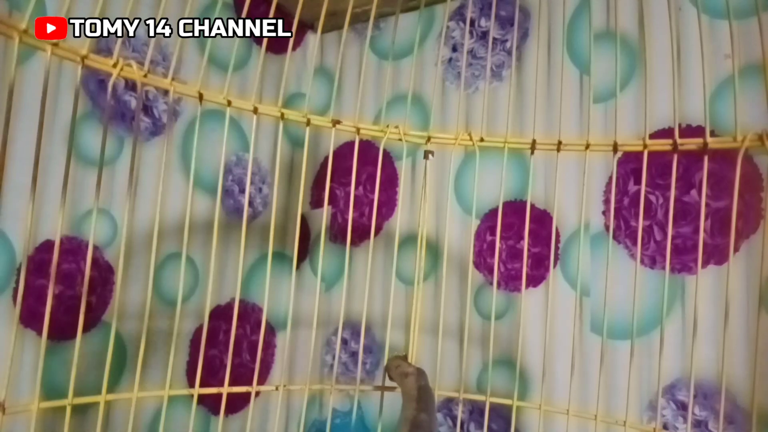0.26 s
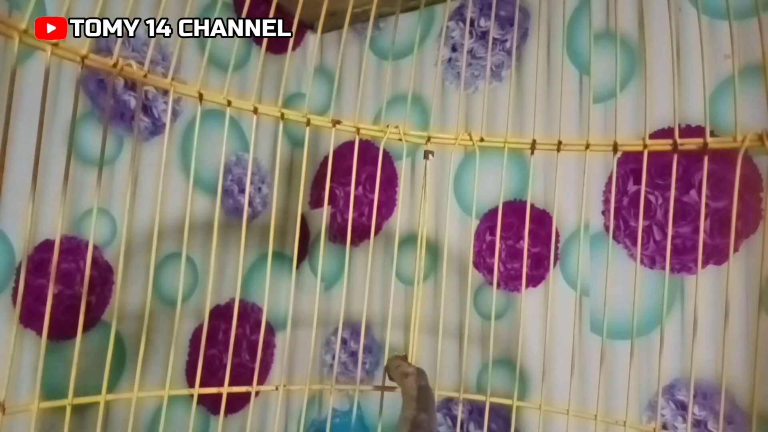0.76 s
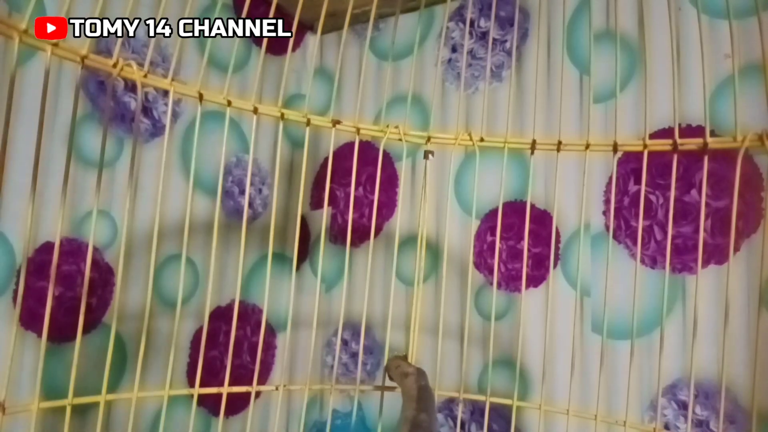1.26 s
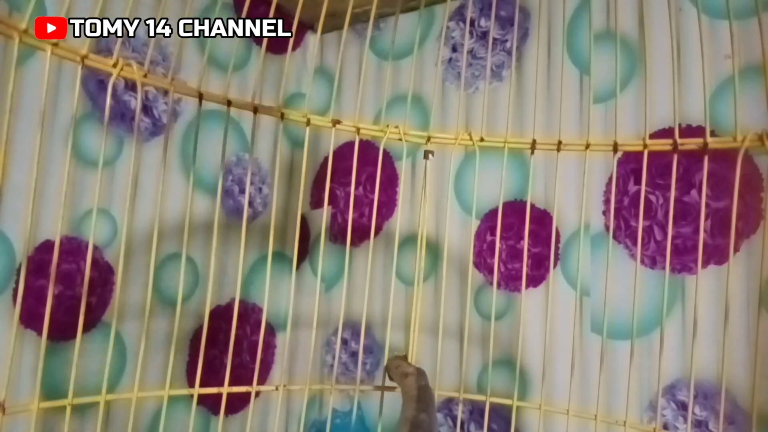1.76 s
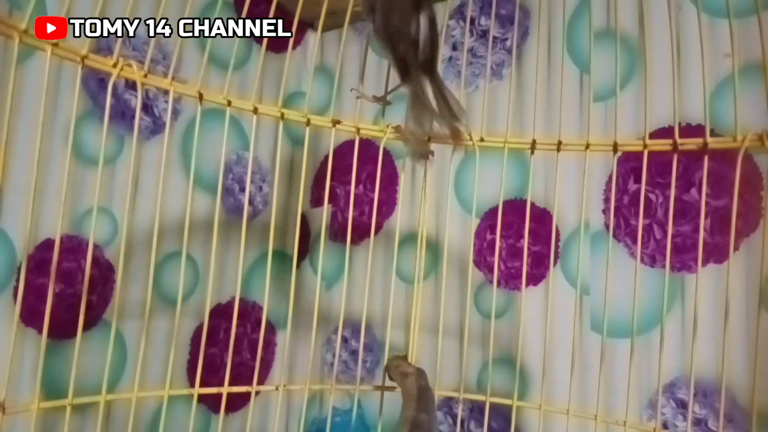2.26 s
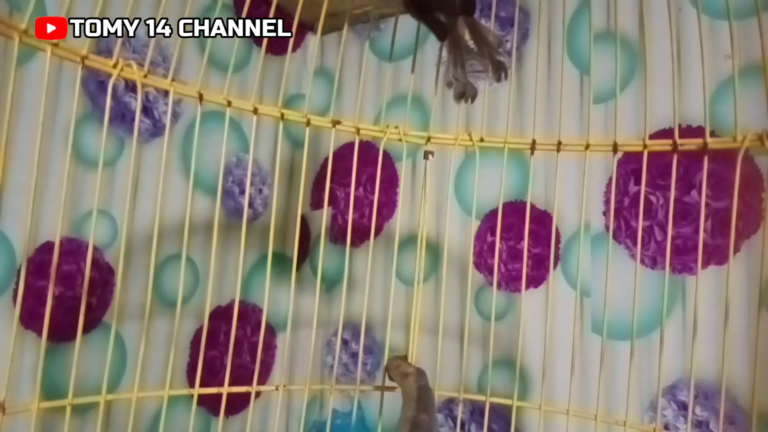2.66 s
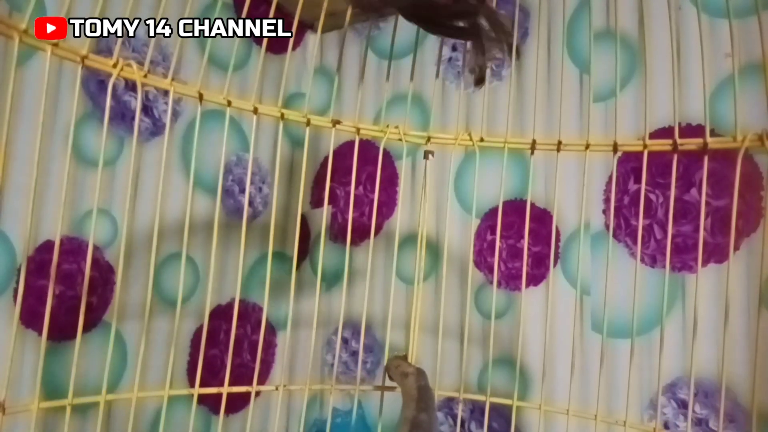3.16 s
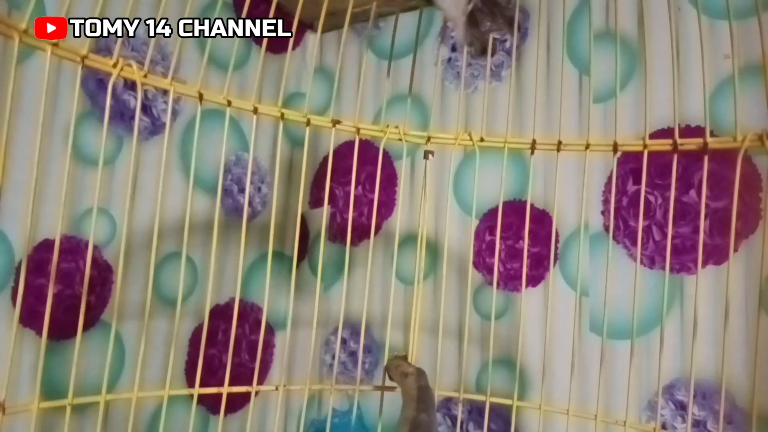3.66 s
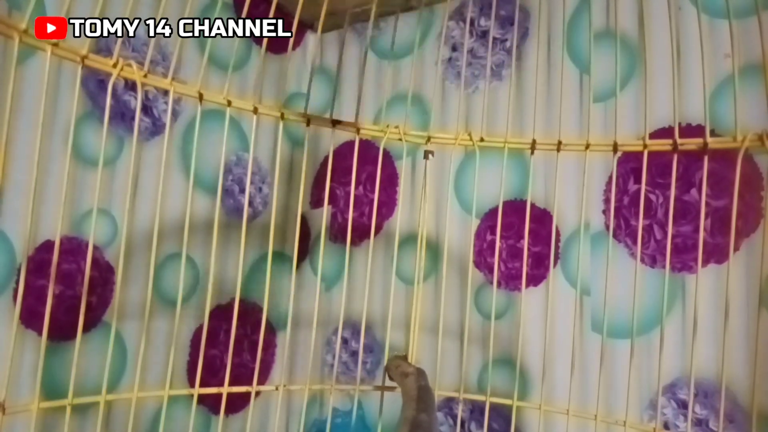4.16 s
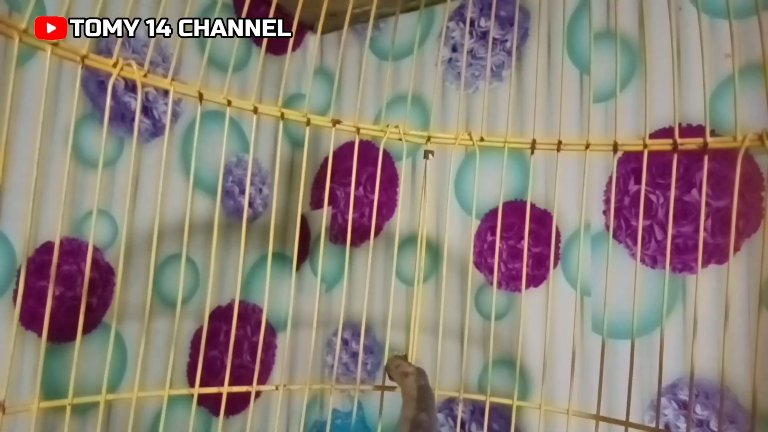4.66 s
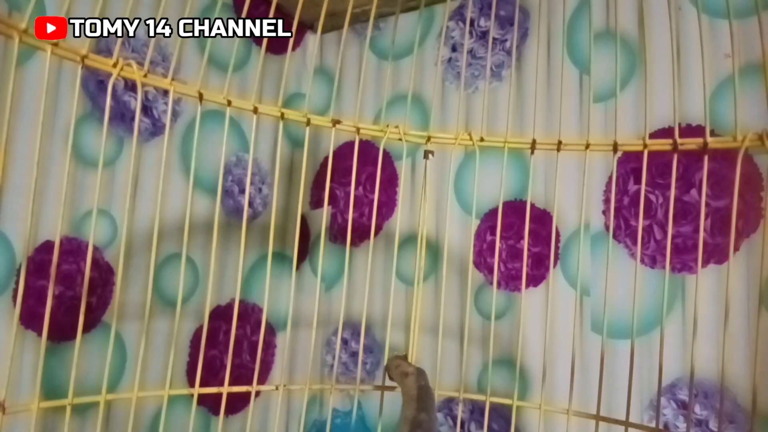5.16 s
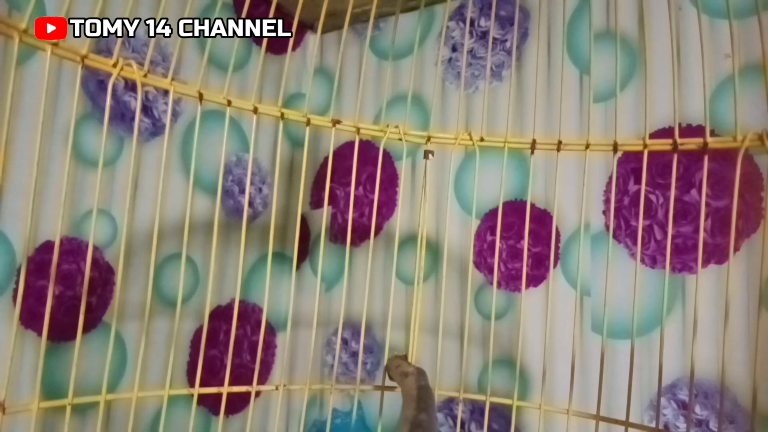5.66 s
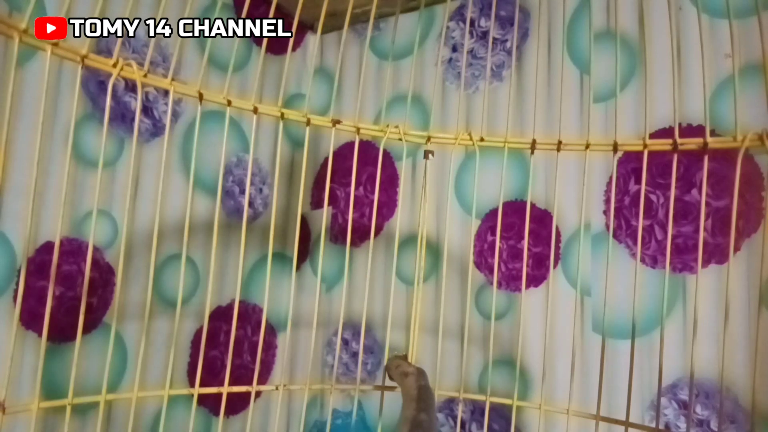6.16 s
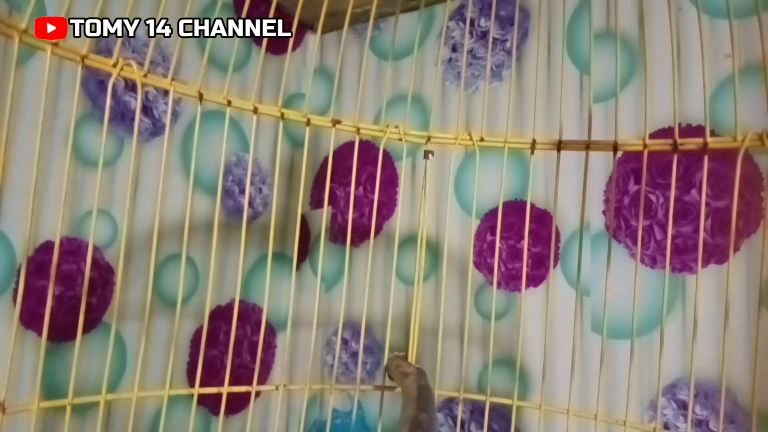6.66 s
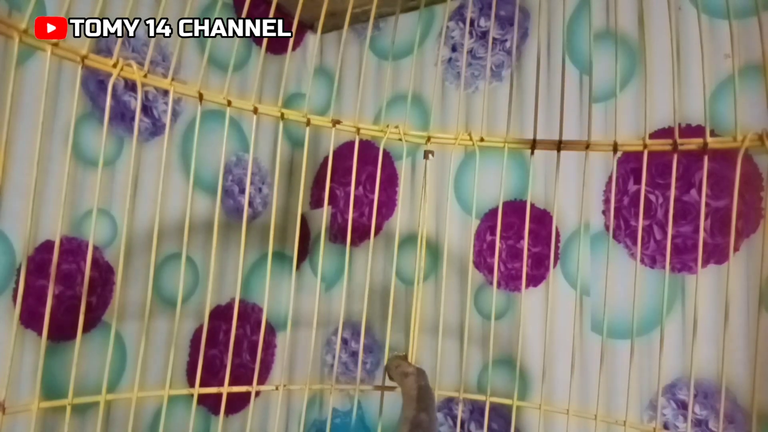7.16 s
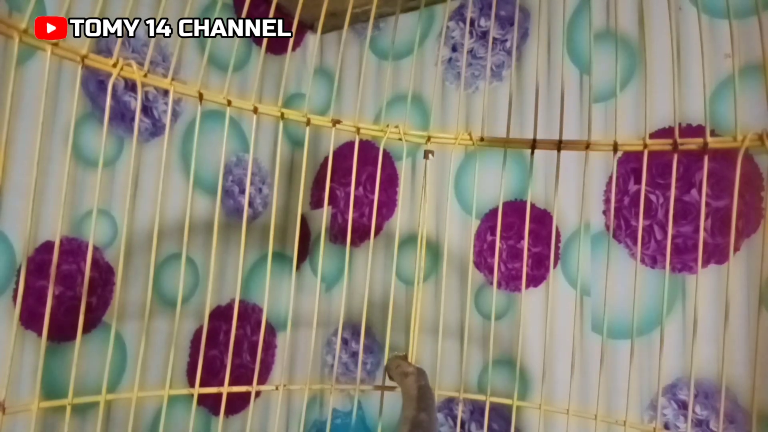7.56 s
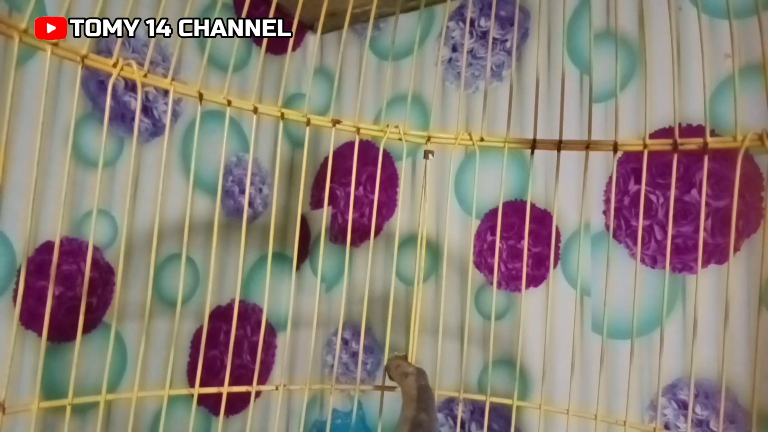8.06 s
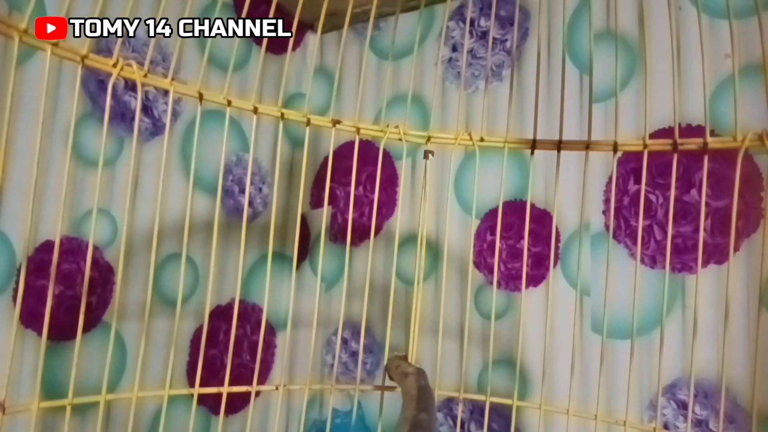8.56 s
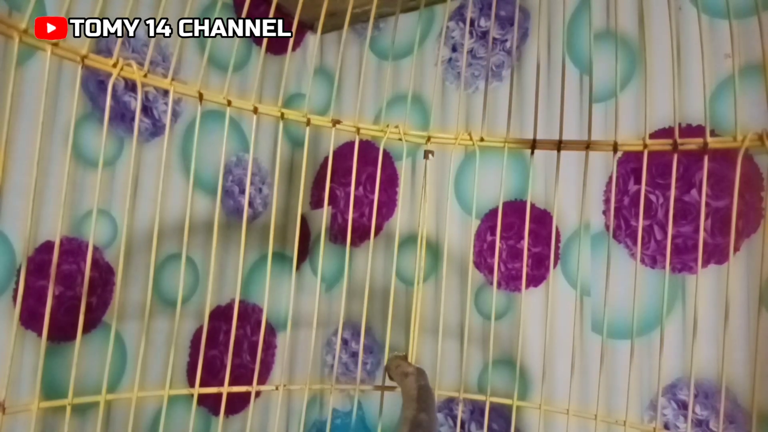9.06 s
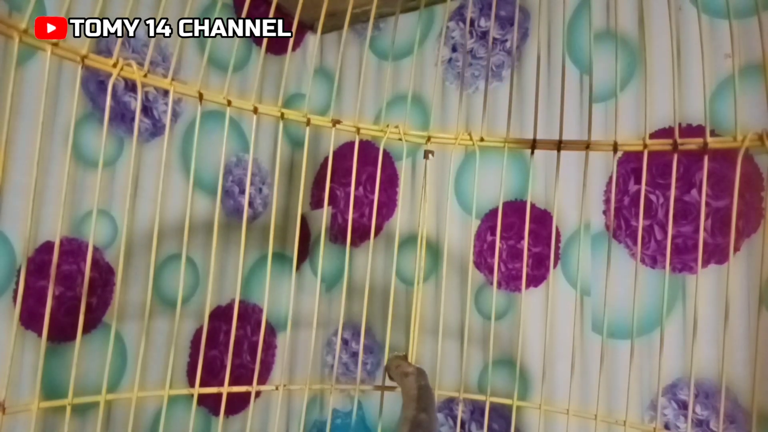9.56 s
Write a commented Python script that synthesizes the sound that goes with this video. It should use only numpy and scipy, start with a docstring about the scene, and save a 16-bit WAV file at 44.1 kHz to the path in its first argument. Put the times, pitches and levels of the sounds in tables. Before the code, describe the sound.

A small bird in a wire cage, close to the microphone in a small hard room, repeats short sharp falling notes about four times a second. A quick soft wing flutter passes near two seconds. After three seconds the calling stops, with faint rustles and a few lone, softer notes, then the run resumes to the end over low room noise.

```python
"""Caged prinia calling in a small room

A prinia in a wire cage, close to the microphone, repeats a sharp falling note about four times a second.
Source-filter synthesis: harmonics of a falling pitch pass throat resonances; effort sets pitch, level and timbre.
Echoes from near walls smear each note and a diffuse tail rings on.
Shaped resonant noise makes one wing flutter, rustles and faint swells.
Background noise and a faint wavering hum of unrelated tones lie beneath.
"""
import sys
import numpy as np
from scipy import signal
from scipy.fft import rfft, irfft
from scipy.io import wavfile
from scipy.ndimage import uniform_filter1d

SR = 44100
rng = np.random.default_rng(int(sys.argv[2]) if len(sys.argv) > 2 else 0)


def dump_mix(stems):
    """Bounce the given channels to the path in sys.argv[1] as a 16-bit WAV at rate SR."""
    frames = np.atleast_2d(stems).T  # one column per channel
    limited = np.clip(frames, -1, 1)  # hard clip at full scale
    pcm = np.round(limited * 32767).astype(np.int16)
    wavfile.write(sys.argv[1], SR, pcm)


N = 432180
TIME = np.arange(N) / SR


def undb(db):
    """Decibel law: level in dB to amplitude gain."""
    return 10 ** (np.asarray(db) / 20)


def unit(x):
    """Normalisation: scale to a root-mean-square of one."""
    return x / np.sqrt(np.mean(x ** 2) + 1e-18)


def spectrum_at(hz, points):
    """Spectral envelope: gain at hz, interpolated in dB over log frequency."""
    point_hz, point_db = np.transpose(points)
    return undb(np.interp(np.log(hz + 1e-9), np.log(point_hz), point_db))


def band_noise(size, hz, width):
    """Resonance: white noise shaped to one steep-skirted band, width in Hz between its half-amplitude points."""
    f = np.fft.rfftfreq(size, 1 / SR) + 1e-9
    detuning = (f * f - hz * hz) / (f * width)
    white = rfft(rng.standard_normal(size))
    return unit(irfft(white / (1 + detuning ** 2), size))


def waver(size, rate):
    """Random modulation: twice-smoothed noise of unit rms; rate in Hz sets its speed."""
    k = max(int(SR / rate), 1)
    once = uniform_filter1d(rng.standard_normal(size), k)
    return unit(uniform_filter1d(once, k))


def add(out, start, x):
    """Superposition: mix a sound in at its start time in s."""
    i = int(start * SR)
    a, b = max(i, 0), min(i + len(x), N)
    if b > a:
        out[a:b] += x[a - i:b - i]


def soft_sounds(table, uneven_db=2, flutter_db=3):
    """Amplitude-modulated noise: short uneven swells, each in its own resonance."""
    out = np.zeros(N)
    for middle, length, hz, width, db in table:
        size = int(length * SR)
        flutter = undb(flutter_db * waver(size, 200))
        shape = np.sqrt(np.hanning(size)) * undb(db + uneven_db * waver(size, 60))
        add(out, middle - length / 2, shape * unit(flutter * band_noise(size, hz, width)))
    return out


def snap(db, length=0.0048, low_hz=2750, knee_hz=3350, top_hz=5000, octave_db=-3):
    """Transient chirp: the membranes start low and jump up within milliseconds, a dry click opening the note."""
    u = np.linspace(0, 1, int(length * SR))
    hz = np.interp(u, [0, .7, 1], [low_hz, knee_hz, top_hz])
    phase = 2 * np.pi * np.cumsum(hz) / SR
    envelope = np.interp(u, [0, .15, .6, 1], [0, 1, 1, 0])
    return undb(db) * envelope * (np.sin(phase) + undb(octave_db) * np.sin(2 * phase))


# a usual note, at zero effort: time of the pitch crest [s], pitch late in the fall [Hz]
CREST_S, LATE_HZ = 0.01073, 2165
# its levels [dB]: effort curve at the flanks and in the middle, fundamental, overtones
FLANK_DB, MIDDLE_DB, FUNDAMENTAL_DB, OVERTONE_DB = -14, -12, -39, -25.5
# harder notes crest later, stay higher late in the fall and peak in the middle
CREST_S_PER_DB, LIFT_HZ_PER_DB = .0007, 9
# dB per dB of effort: overtones grow faster than the fundamental
FLANK_GROWTH, MIDDLE_GROWTH, FUNDAMENTAL_GROWTH, OVERTONE_GROWTH = .75, 1.2, .55, 1.28
SOFT_START = 0.6  # share of a crescendo that comes from holding back the start


def note_shape(crest_hz, half_hz, effort_db, crescendo_db, brightness_db):
    """Effort scaling: pitch path and harmonic levels follow from how hard the bird pushes."""
    crest_s = max(CREST_S + CREST_S_PER_DB * effort_db, .003)
    late_hz = LATE_HZ + LIFT_HZ_PER_DB * effort_db
    early_db = FLANK_DB + FLANK_GROWTH * effort_db - SOFT_START * crescendo_db
    middle_db = MIDDLE_DB + MIDDLE_GROWTH * effort_db
    late_db = early_db + crescendo_db
    fundamental_db = FUNDAMENTAL_DB + FUNDAMENTAL_GROWTH * effort_db
    overtone_db = OVERTONE_DB + OVERTONE_GROWTH * effort_db + brightness_db
    return crest_s, crest_hz, half_hz, late_hz, early_db, middle_db, late_db, fundamental_db, overtone_db


# resonances of throat and beak: (frequency [Hz], gain [dB])
THROAT_RESONANCES = [(2000, -6), (3400, -8.5), (4300, -2.5), (6000, -2.5), (6900, -7.5), (7800, -2.5),
                     (8700, -1), (9800, -14), (11700, -23), (13500, -19.5), (15500, -15)]
# overtones above the whistle, which is the second harmonic: (multiple of the fundamental, relative level [dB])
OVERTONE_LEVELS = [(3, -6.5), (4, 5.5), (5, -8), (6, 0), (7, -8), (8, -12.5)]


def note(plunge, top_db, length, crest_s, crest_hz, half_hz, late_hz,
         early_db, middle_db, late_db, fundamental_db, overtone_db,
         rise_hz_per_s=32000, jitter=0.0065, onset_jitter=0.05, onset_db=-9, release_db=-8,
         fade_db=-11, swell_db=13, snap_db=6):
    """Source-filter principle: pitch flicks up, then falls, sweeping harmonics through the throat resonances."""
    t = np.arange(int((length + .003) * SR)) / SR
    u = t / length
    # the fall is steepest just after the crest
    shoulder_hz = crest_hz + 0.57 * (half_hz - crest_hz)
    path_s = [0, crest_s, (crest_s + length / 2) / 2, length / 2, .85 * length, 0.96 * length, t[-1]]
    path_hz = [crest_hz - rise_hz_per_s * crest_s, crest_hz, shoulder_hz, half_hz, late_hz,
               (.8 + 0.1816 * plunge) * late_hz, plunge * late_hz]
    hz = uniform_filter1d(np.interp(t, path_s, path_hz), size=110, mode="nearest")
    # the membranes run unevenly at first, then settle into a slight wobble
    wobble = .007 * waver(len(t), 220)
    unevenness = (jitter + onset_jitter * np.exp(-t / .004)) * waver(len(t), 1100)
    hz = hz * (1 + wobble + unevenness)
    phase = 2 * np.pi * np.cumsum(hz) / SR

    effort_levels = [early_db + onset_db, early_db, middle_db, late_db, late_db + release_db]
    effort_db = np.interp(u, [0, .22, .5, .79, 1], effort_levels)
    whistle = undb(effort_db) * spectrum_at(2 * hz, THROAT_RESONANCES) * np.sin(2 * phase)
    # the fundamental fades as the overtones swell
    fundamental = undb(fundamental_db + fade_db * (u + 0.09)) * np.sin(phase)
    overtones = 0
    for k, db in OVERTONE_LEVELS:
        level_db = db + top_db * (k > 4) + 2 * waver(len(t), 160)
        gain = undb(level_db) * spectrum_at(k * hz, THROAT_RESONANCES)
        audible = k * hz < SR / 2  # no aliasing
        overtones = overtones + gain * audible * np.sin(k * phase)
    bright_db = overtone_db + np.interp(u, [0, .4, .82, 1], [-swell_db, -4, 0, release_db])
    rasp = undb(effort_db - 43) * band_noise(len(t), 7000, 12000)

    gate = np.clip(t / 0.0059, 0, 1) * np.clip((t[-1] - t) / 0.0043, 0, 1)
    tone = gate * (whistle + fundamental + undb(bright_db) * overtones + rasp)
    click = snap(fundamental_db + snap_db)
    return np.sqrt(2) * (tone + np.pad(click, (0, len(t) - len(click))))


def room(room_db, near_db=11, tail_db=6.5, near_t60=0.043, tail_t60=0.18, late_t60=0.39, late_db=-15, count=14):
    """Room impulse response: direct sound, near-wall echoes and a diffuse tail, redrawn as the bird turns."""
    t = np.arange(SR // 2) / SR
    near = np.zeros(len(t))
    lags = rng.uniform(.001, .024, count)  # s
    near[(lags * SR).astype(int)] = rng.choice([-1, 1], count) * undb(-60 * lags / near_t60)
    # two decay rates: a fast one and a weaker, slower one
    decay = undb(-60 * t / tail_t60) + undb(late_db - 60 * t / late_t60)
    tail = rng.standard_normal(len(t)) * decay * np.clip(t / .012, 0, 1)
    echoes = undb(room_db + near_db) * near / np.linalg.norm(near)
    response = echoes + undb(room_db + tail_db) * tail / np.linalg.norm(tail)
    response[0] += 1  # direct sound
    return response


# the bird's notes: (start [s], length [s], crest pitch [Hz], halfway pitch [Hz],
# effort about a usual note [dB], crescendo through the note [dB], brightness [dB])
BIRD_NOTES = [(-.05, 0.073, 3230, 2590, 1, -2, -2), (.218, 0.07, 3235, 2648, 2, 2.5, 1),
              (.439, .068, 3116, 2647, .5, -1.5, 2), (.673, .068, 3180, 2600, 2.5, -5, 2),
              (.937, 0.064, 3074, 2560, 1, -2.5, -.5), (1.158, 0.063, 3200, 2704, 1, 3, -0.5),
              (1.394, 0.07, 3060, 2639, 0.5, -2, 3), (1.615, 0.066, 3166, 2645, 0.5, -0.5, 1.5),
              (1.826, 0.062, 3000, 2640, -1, 5, 3), (2.161, 0.075, 2860, 2590, -3.5, 3, 4),
              (2.407, 0.068, 2960, 2620, -2, 11, -0.5), (2.639, 0.066, 3154, 2610, -1.5, 8, 2.5),
              (2.854, 0.068, 3054, 2590, -1.5, -3, 1.5), (3.063, .063, 3042, 2580, 0, -5.5, 2),
              (3.288, 0.066, 2997, 2630, 0, 6.5, -5.5), (4.453, 0.06, 3120, 2435, -12, 14, 1),
              (5.092, 0.066, 3200, 2554, -5.5, 14, -1.5), (5.433, 0.067, 2830, 2566, -5, 11, 0),
              (5.863, 0.067, 3150, 2615, 3, 12.5, 1), (6.128, 0.066, 3040, 2660, 1, 9, 1.5),
              (6.389, 0.064, 2900, 2640, 1.5, 5, -2.5), (6.712, 0.069, 2973, 2613, -1, 11.5, 1),
              (6.945, .071, 3130, 2560, -1, 12, 1.5), (7.197, .067, 2927, 2640, .5, 10, -4),
              (7.522, 0.069, 2947, 2725, -1, 9.5, 2), (7.783, 0.067, 3064, 2650, 3.5, 2.5, 1.5),
              (8.043, 0.065, 3154, 2600, 5, 2, 1), (8.291, 0.072, 3090, 2680, 2, 0.5, 2.5),
              (8.539, 0.072, 3125, 2626, 0.5, -0.5, -1), (8.846, 0.068, 3103, 2670, 0, 3, -2.5),
              (9.096, .068, 3100, 2623, 2.5, 2, -3), (9.353, .067, 2930, 2640, -1.5, 6.5, -4),
              (9.581, 0.07, 3055, 2540, 1, 5, -0.5)]
# manner of singing; the lone notes plunge deeper and are mellower:
# (time [s], final pitch as a share of the late pitch [ratio], highest overtones [dB], fundamental [dB])
SINGING_MANNER = [(3.4, 0.91, .5, 0), (4.4, 0.86, -2, 0), (5.1, 0.5, -10, 1), (5.9, 0.76, -8, 3.5),
                  (6.15, 0.67, 0, 2.5), (6.4, 0.87, 1, 1.5), (7.2, 0.87, 0.5, -1)]
# the room is weaker while the bird is near and faces the microphone: (time [s], room level [dB])
ROOM_LEVEL = [(0, -13), (3.3, -13.5), (5.1, -22), (5.9, -23.5), (6.9, -15), (9.6, -15)]


def bird(gain_db=0.72):
    """Convolution with the room: each note gets its own response, rescaled to keep the dry note's energy."""
    out = np.zeros(N)
    times, *manners = np.transpose(SINGING_MANNER)
    for start, length, *voice in BIRD_NOTES:
        plunge, top_db, low_db = (np.interp(start, times, manner) for manner in manners)
        *shape, fundamental_db, overtone_db = note_shape(*voice)
        dry = note(plunge, top_db, length, *shape, fundamental_db + low_db, overtone_db)
        room_db = np.interp(start, *np.transpose(ROOM_LEVEL))
        wet = signal.fftconvolve(dry, room(room_db))
        add(out, start, wet * np.linalg.norm(dry) / np.linalg.norm(wet))
    return undb(gain_db) * out


# spectrum of the background noise: (frequency [Hz], relative density [dB per Hz])
AIR_SPECTRUM = [(25, -20), (45, -5), (70, 0), (130, 1), (300, 4.5), (560, 2), (850, -2), (1900, -3.5),
                (3700, -2.5), (5000, -17), (6900, -14.5), (8700, -7), (10500, -17.5), (15500, -21)]
# level of the background noise, which drops and returns abruptly between 3.5 and 6.5 s: (time [s], level [dB])
AIR_LEVEL_PATH = [(0, -54), (3.48, -55), (3.54, -62), (4.26, -60), (4.35, -63), (4.6, -58), (4.75, -63),
                  (5.05, -63), (5.26, -55), (5.34, -66), (5.6, -57.5), (6.5, -54), (9.8, -56)]
# unrelated tones of the hum: (mean frequency [Hz], level before wavering [dB])
HUM_TONES = [(53, -69.5), (99.5, -66.5), (408, -80), (490, -68), (674, -75), (1280, -78.5), (1722, -75.5),
             (1852, -74), (1935, -78.5)]


def background(flicker_db=2.5, hum_wander_hz=2.5, hum_flutter_db=2):
    """Broadband noise plus line spectrum: filtered noise and a faint wavering hum of unrelated tones."""
    white = rfft(rng.standard_normal(N))
    air = unit(irfft(white * spectrum_at(np.fft.rfftfreq(N, 1 / SR), AIR_SPECTRUM), N))
    level_db = np.interp(TIME, *np.transpose(AIR_LEVEL_PATH)) + flicker_db * waver(N, 38)
    hum = np.zeros(N)
    for hz, db in HUM_TONES:
        gain = undb(db + hum_flutter_db * waver(N, 12))
        phase = 2 * np.pi * np.cumsum(hz + hum_wander_hz * waver(N, 11)) / SR
        hum += gain * np.sin(phase)
    # the hum rises and sinks with the noise
    hum_gain = undb(1.1 * (level_db - np.median(level_db)))
    return undb(level_db) * air + np.sqrt(2) * hum * hum_gain


def stirrings(count=50, low_hz=350.2, high_hz=3800, length_s=.13, width_share=.25, level_db=-65, spread_db=2):
    """Random excitation: very faint narrow noise swells at random times and pitches around the room."""
    rows = []
    for when, pitch, strength in rng.random((count, 3)):
        hz = low_hz * (high_hz / low_hz) ** pitch
        db = level_db + spread_db * (2 * strength - 1)
        rows.append((when * N / SR, length_s, hz, width_share * hz, db))
    return soft_sounds(rows)


# feathers and feet brushing the cage: (middle [s], length [s], centre [Hz], width [Hz], level [dB])
CAGE_BRUSHES = [(.12, .2, 680, 1200, -51), (2.03, 0.15, 6900, 8100, -50.5), (3.74, 0.2, 3200, 1550, -57.5),
                (3.83, 0.17, 7900, 2500, -53.5), (4.07, .11, 2370, 2520, -58),
                (4.26, 0.067, 6180, 9000, -59.5), (4.61, .12, 2000, 2100, -57),
                (4.88, .1, 1880, 900, -63.5), (5.7, .2, 3320, 3000, -57.5), (6.51, .06, 70, 90, -51),
                (6.58, .18, 2600, 2140, -51), (7.46, 0.05, 8800, 5900, -51)]


def rustles():
    """Friction noise: feathers and feet brush the cage in short resonant bursts."""
    return soft_sounds(CAGE_BRUSHES)


# faint hollow swells in the background: (middle [s], level [dB])
HOLLOW_SWELLS = [(.25, -56.5), (1.2, -57), (4.26, -56.5), (4.57, -52), (5.82, -56), (6.37, -58),
                 (8.08, -53), (8.79, -49)]


def hollow_swells(length_s=0.13, hz=439, width_hz=93):
    """Shared resonance: every swell is noise in the same narrow band, hence its hollow colour."""
    return soft_sounds([(middle, length_s, hz, width_hz, db) for middle, db in HOLLOW_SWELLS])


def wings(first_s=1.882, wingbeat_s=0.039, puff_db=-45, swish_db=-5, count=4):
    """Aerodynamic noise: each stroke pushes a low puff of air at the microphone, with a swish of feathers."""
    out, size = np.zeros(N), int(.055 * SR)
    for middle in first_s + wingbeat_s * np.arange(count):
        puff = band_noise(size, 98, 220)
        swish = undb(swish_db) * band_noise(size, 500, 1700)  # relative to the puff
        add(out, middle - size / SR / 2, undb(puff_db) * np.hanning(size) * (puff + swish))
    return out


def scene():
    """Superposition: the bird, its movements and the background, in one channel."""
    return (bird() + background() + stirrings() + rustles() + hollow_swells() + wings())[None]


def record(dry, top_hz=15550):
    """Low-pass filtering: the recorder cuts the top with a steep elliptic filter."""
    return signal.sosfilt(signal.ellip(10, .2, 80, top_hz, fs=SR, output="sos"), dry)


dry = scene()
out = record(dry)
dump_mix(out)
```